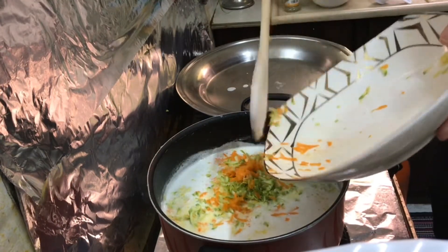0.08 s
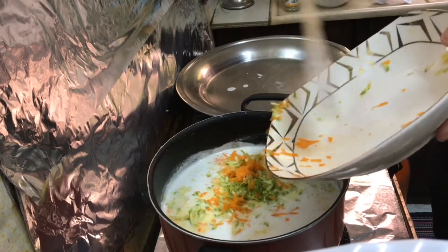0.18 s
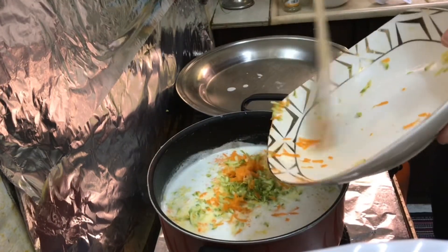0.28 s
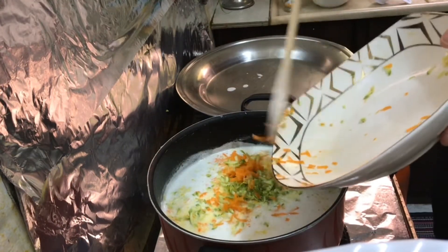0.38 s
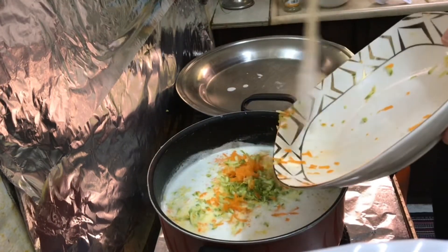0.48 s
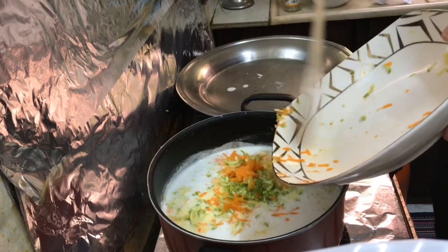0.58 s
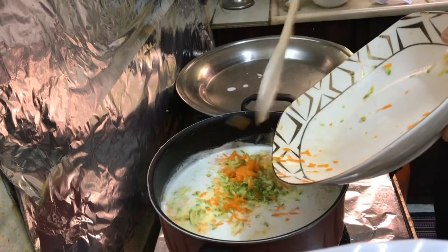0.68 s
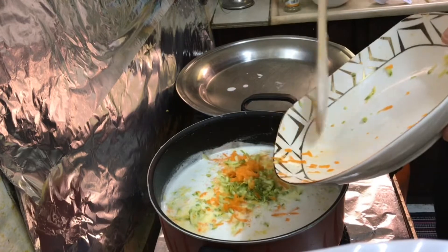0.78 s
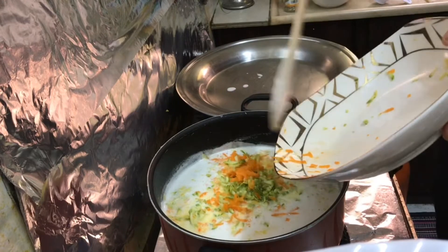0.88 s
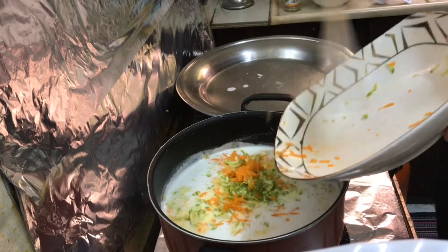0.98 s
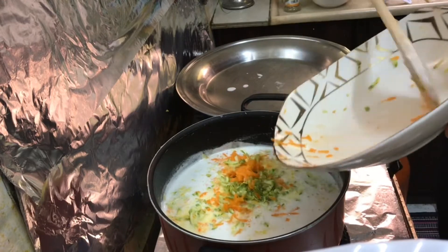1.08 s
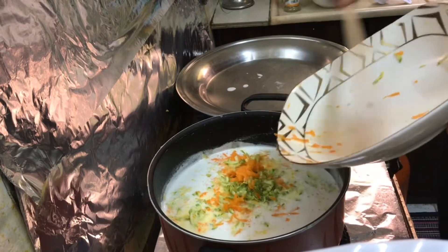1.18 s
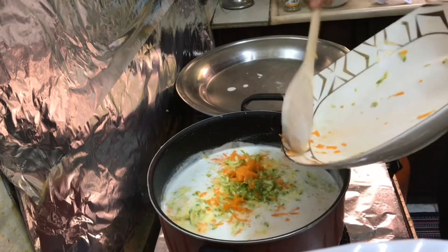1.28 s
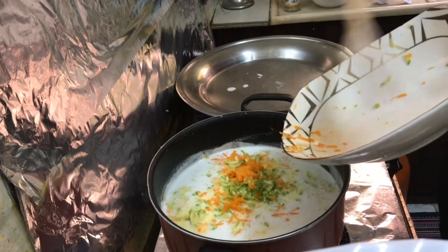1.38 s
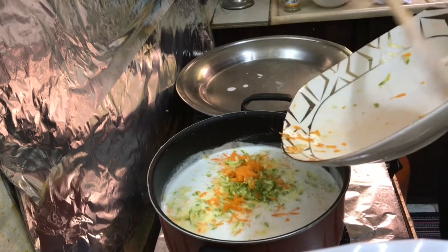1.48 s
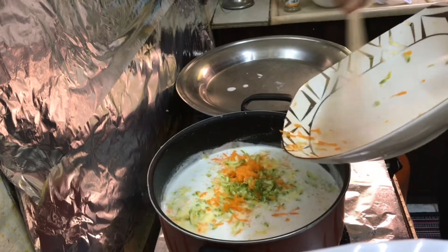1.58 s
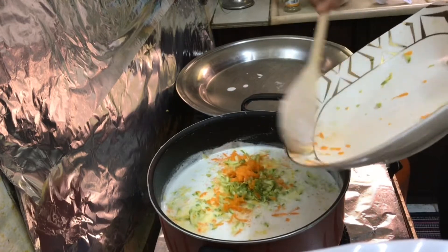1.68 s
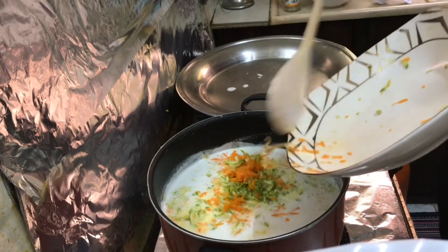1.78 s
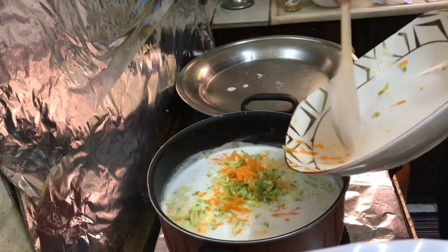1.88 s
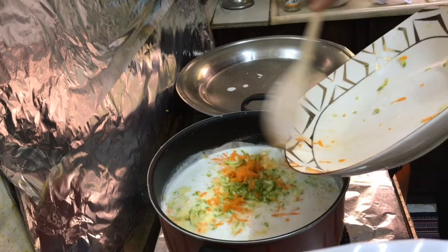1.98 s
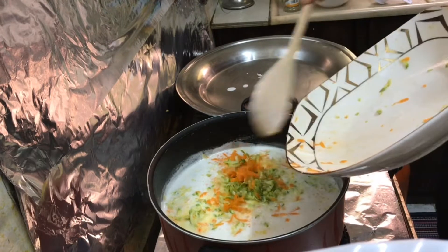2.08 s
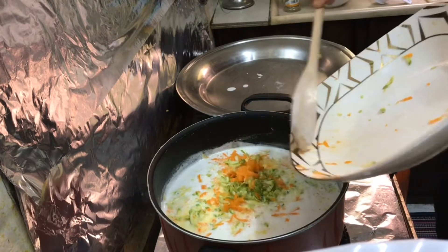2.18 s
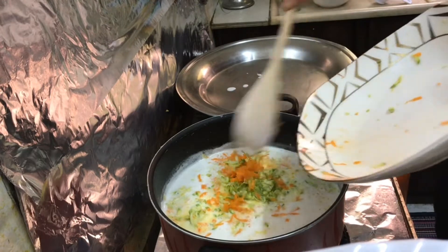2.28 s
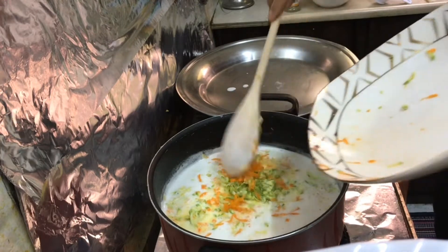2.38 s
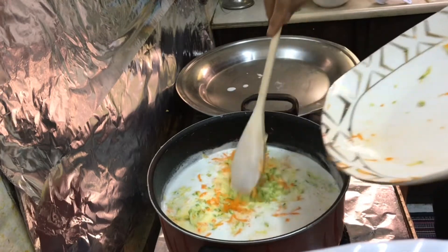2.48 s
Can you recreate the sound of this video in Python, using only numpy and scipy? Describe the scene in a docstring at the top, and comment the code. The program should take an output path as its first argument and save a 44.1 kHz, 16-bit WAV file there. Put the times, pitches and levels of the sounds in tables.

```python
"""A wooden spoon knocks seven times on the rim of a hand-held ceramic bowl, over a pot in a small kitchen.
Each blow gives a contact crack of noise, a hollow knock of the wood's modes and a ring of the bowl's modes,
which share the energy according to where the spoon lands. The blows reach the one microphone directly,
with a short room tail; an appliance hums, drones and rushes softly in the background."""
import sys
import numpy as np
from scipy import signal
from scipy.fft import rfft, irfft
from scipy.io import wavfile
from scipy.ndimage import uniform_filter1d

SR = 44100
rng = np.random.default_rng(int(sys.argv[2]) if len(sys.argv) > 2 else 0)


def store_wav(level_fs):
    """Save 16-bit WAV to argv[1]."""
    pcm = np.round(np.clip(np.atleast_2d(level_fs), -1, 1) * 32767)
    wavfile.write(sys.argv[1], SR, pcm.T.astype(np.int16))


N = 110250

# appliance hum: [f/Hz, middle level/dB rms, waver/dB]
HUM_TONES = [(58.1, -60.5, -12), (119.9, -40.5, 0.62)]
# broad resonances droning in the appliance: [f/Hz, width at half amplitude/Hz, level/dB rms]
DRONE_RESONANCES = [(60.8, 7.7, -56.5), (81.4, 6.7, -66), (146, 10, -49), (186, 18, -57), (276.6, 27, -60),
                    (400.3, 72, -51), (511, 41, -55), (578, 40, -56)]
# spectrum of the appliance's rush of air: [f/Hz, relative level/dB]
AIR_SPECTRUM = [(25, -13), (60, 5), (100, 2), (170, -2), (300, -4), (420, -7.5), (700, -1.5), (900, -9),
                (1500, -14.5), (2300, -12.5), (3100, -20), (4000, -19), (5000, -25), (6400, -26.5),
                (10000, -33.5), (13000, -34), (16000, -36)]
# blows of the spoon: [t/s, then level/dB of spoon knock, bowl thud, low ring, long ring, main ping,
# side ping, upper ping, bright ring, low crack, mid crack, treble crack]
BLOWS = [ (0.2361, -18, -22.5, -46, -52, -6.5, -5, -19.5, -29, -17.5, -12.5, -18.5),
         (0.5489, -17.5, -21.5, -35.5, -41, -23, -38, -18.5, -44, -10.5, -4, -14),
         (0.7955, -17, -22.5, -40, -49.5, -37, -59, -36.5, -38.5, -17, -27, -27.5),
         (1.0440, -19.5, -24.5, -42, -68, -11, -30, -14, -44, -21.5, -7.5, -13.5),
         (1.4547, -26, -22, -42, -31, -21.5, -23, -27.5, -19.5, -19.5, -22.5, -15),
         (1.906, -19.5, -24.5, -42, -65, -14, -13, -10.5, -55, -16.5, -14.5, -24.5),
         (2.1637, -49, -16, -24.5, -23, -12.5, -37, -20, -15, -10, -16.5, -18.5)]
# modes of the wooden spoon: [f/Hz, relative level/dB, t60/s]
SPOON_MODES = [(252.5, -12.5, 0.059), (372, -8.5, 0.063), (499, -13, 0.1), (737, -5.5, 0.024),
               (848, -6, 0.07)]
# modes of the bowl, in families that a blow excites together: name -> [f/Hz, relative level/dB, t60/s]
# (the main ping holds a close cluster that beats about 23 times a second)
BOWL_FAMILIES = { "thud": [ (598, -5, .05), (645, -1, .045), (688, 0, .05), (1196, -18, 0.046)],
                 "low ring": [ (1180, -15, .5), (1803, -2, .3), (1170, 6, 0.091), (1830, -6, 0.043)],
                 "long ring": [ (2536, 0, .34), (4418, -14, .28)], "main ping": [ (2279, -17, .17),
                 (2302, -12, .2), (2325, -11, .23), (2348, -16, .16), (2394, 3, 0.044)],
                 "side ping": [(2313, -10.5, 0.024), (2511, -11, 0.081)], "upper ping": [ (3790, -8, .035),
                 (3819, -1, .05), (3822, -26, .27), (5597, -13.5, 0.033), (5980, -16.5, 0.07),
                 (6900, -35, 0.15), (7830, -24, 0.065), (9860, -32, .08)], "bright ring": [ (3431, 0, .115),
                 (5390, -6, .07), (8158, -14, .05), (5575, -33, 0.065), (6030, -15.5, 0.051),
                 (6850, -27, .1), (11480, -28, 0.084), (12900, -28, 0.053)]}
# bands of the contact crack: [low f/Hz, high f/Hz, t60/s]
CRACK_BANDS = [(1160, 1670, 0.015), (2680, 3760, 0.014), (4070, 7440, 0.013)]
# room tail: [f/Hz, level against the direct sound/dB, t60/s]
ROOM_TAIL = [(238, -2, 0.47), (695, -3.5, 0.25), (1200, -4.5, 0.3), (2280, -13.5, 0.34), (3230, -7.5, 0.26),
             (5400, -6.5, 0.28), (8000, -4, 0.18), (15000, -7.5, 0.22)]

AIR_DB, AIR_FLICKER_DB = -47.5, 0.18
HUM_WAVER_RATE, AIR_FLICKER_RATE = 4.9, 16.7  # new values a second
RING_ATTACK_S, CRACK_ATTACK_S = 0.00098, 0.00063
FLUTTER_DB, FLUTTER_RATE, FLUTTER_ONSET_S = 3.5, 130, 0.015  # rate: about this many new values a second
SPIT_BAND = (11000, 14600, 0.023)  # very top of the crack: low f/Hz, high f/Hz, t60/s
SPIT_DB = -15.5  # against the treble crack
ROOM_ONSET_S, ROOM_EVEN_HZ = 0.0033, 70
RUMBLE_HZ, TOP_HZ = 43.6, 15800


def undb(db):
    """Turn decibels into an amplitude factor."""
    return 10 ** (np.asarray(db) / 20)


def unit(x):
    """Scale to rms 1."""
    return x / np.sqrt(np.mean(x ** 2))


def walk(rate):
    """Smooth random wander of rms 1, from `rate` new values a second."""
    k = int(SR / rate)
    steps = np.repeat(rng.standard_normal(N // k + 1), k)
    return unit(uniform_filter1d(uniform_filter1d(steps, k), k)[:N])


def noise(gain):
    """Noise of rms 1 with a given gain in every frequency bin."""
    return unit(irfft(rfft(rng.standard_normal(N)) * gain, N))


def hum():
    """Steady low tones, each wavering in level."""
    t = np.arange(N) / SR
    out = np.zeros(N)
    for hz, db, waver_db in HUM_TONES:
        level = np.sqrt(2) * undb(db + waver_db * walk(HUM_WAVER_RATE))  # rms to peak
        out += level * np.sin(2 * np.pi * (hz * t + rng.random()))
    return out


def drone():
    """Noise narrowed to each resonance of the appliance."""
    f = np.fft.rfftfreq(N, 1 / SR)
    out = np.zeros(N)
    for hz, width, db in DRONE_RESONANCES:
        out += undb(db) * noise(1 / (1 + ((f - hz) / width * 2) ** 2))
    return out


def air():
    """A soft rush: shaped noise with a slight flicker in level."""
    f = np.fft.rfftfreq(N, 1 / SR)
    hz, db = np.array(AIR_SPECTRUM).T
    rush = noise(undb(np.interp(np.log(f + 1), np.log(hz), db)))
    return rush * undb(AIR_DB + AIR_FLICKER_DB * walk(AIR_FLICKER_RATE))


def appliance():
    """The background machine: tonal hum, resonant drone and moving air together."""
    return hum() + drone() + air()


def fade(t, t60):
    """Exponential decay by 60 dB in t60 seconds."""
    return np.exp(-np.log(1000) * t / t60)


def onset(t, rise_s):
    """Smooth rise from 0 to 1."""
    return 1 - np.exp(-(t / rise_s) ** 2)


def ring(modes, t):
    """Decaying modes set going by one short push; a random flutter in level grows after the attack."""
    knot_times = np.linspace(0, 400 / FLUTTER_RATE, 400)
    depth_db = FLUTTER_DB * (1 - np.exp(-t / FLUTTER_ONSET_S))
    out = np.zeros(len(t))
    for hz, db, t60 in modes:
        flutter = np.interp(t, knot_times, rng.standard_normal(len(knot_times)))
        out += undb(db + depth_db * flutter) * fade(t, t60) * np.sin(2 * np.pi * hz * t)
    return out * onset(t, RING_ATTACK_S)


def crack(t, lo_hz, hi_hz, t60):
    """A short burst of contact noise in one band, with the rms of its envelope."""
    shape = fade(t, t60) * onset(t, CRACK_ATTACK_S)
    band_pass = signal.butter(2, [lo_hz, hi_hz], "band", fs=SR, output="sos")
    burst = signal.sosfilt(band_pass, rng.standard_normal(len(t)) * shape)
    return unit(burst) * np.sqrt(np.mean(shape ** 2))


def taps():
    """Every blow sounds the spoon, the bowl's mode families and the contact crack."""
    out = np.zeros(N + SR)
    t = np.arange(SR // 2) / SR
    for start, knock_db, *levels in BLOWS:
        bowl_db, crack_db = levels[:len(BOWL_FAMILIES)], levels[len(BOWL_FAMILIES):]
        blow = undb(knock_db) * ring(SPOON_MODES, t)
        for db, modes in zip(bowl_db, BOWL_FAMILIES.values()):
            blow += undb(db) * ring(modes, t)
        for db, crack_band in zip(crack_db, CRACK_BANDS):
            blow += undb(db) * crack(t, *crack_band)
        blow += undb(crack_db[-1] + SPIT_DB) * crack(t, *SPIT_BAND)
        i = int(start * SR)
        out[i:i + len(t)] += blow
    return out[:N]


def bell(width):
    """Smoothing window of a given width in bins at half height, with sum 1."""
    w = np.hanning(2 * int(width) + 1)
    return w / w.sum()


def kitchen(x):
    """Direct sound and a short diffuse tail, whose level and decay depend on frequency."""
    t = np.arange(SR // 2) / SR
    f = np.fft.rfftfreq(len(t), 1 / SR)
    centres = np.log([row[0] for row in ROOM_TAIL])
    build = onset(t, ROOM_ONSET_S)
    scatter = rng.standard_normal(len(t))
    response = np.zeros(len(t))
    for (hz, db, t60), pick in zip(ROOM_TAIL, np.eye(len(ROOM_TAIL))):
        tail = rfft(scatter * fade(t, t60) * build)
        # even out the spectrum so that no part of the tail stands out
        power = signal.fftconvolve(abs(tail) ** 2, bell(ROOM_EVEN_HZ / f[1]), "same")
        tail = tail / np.sqrt(power)
        # neighbouring bands crossfade along log frequency
        share = np.interp(np.log(f + 1), centres, pick)
        response += undb(db) * build * irfft(tail * share, len(t))
    response[0] += 1  # direct sound
    return signal.fftconvolve(x, response)[:N]


def scene():
    """The blows in the kitchen over the appliance in the background, on one channel."""
    return (kitchen(taps()) + appliance())[None]


def record(dry):
    """The microphone drops the deepest rumble, peaks stop at full scale and the top is cut."""
    low_cut = signal.butter(3, RUMBLE_HZ, "high", fs=SR, output="sos")
    top_cut = signal.ellip(10, .2, 90, TOP_HZ, fs=SR, output="sos")
    limited = np.clip(signal.sosfilt(low_cut, dry), -1, 1)
    return signal.sosfilt(top_cut, limited)


dry = scene()
out = record(dry)
store_wav(out)
```